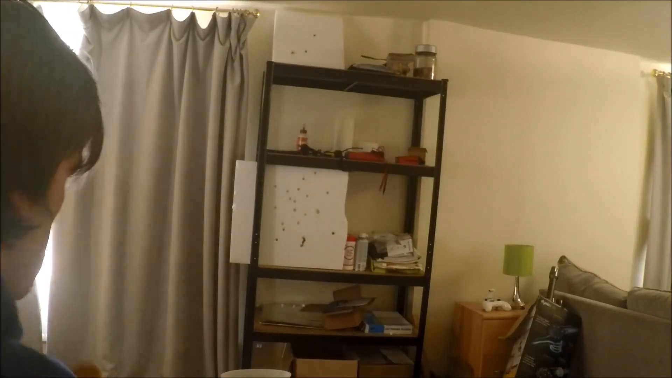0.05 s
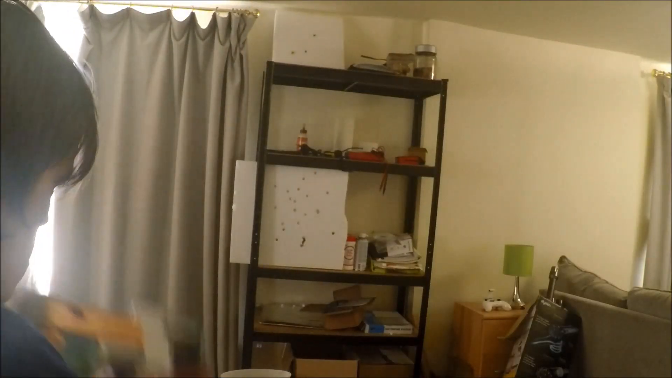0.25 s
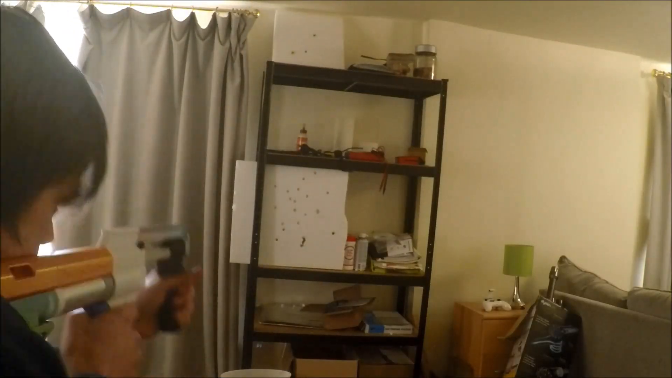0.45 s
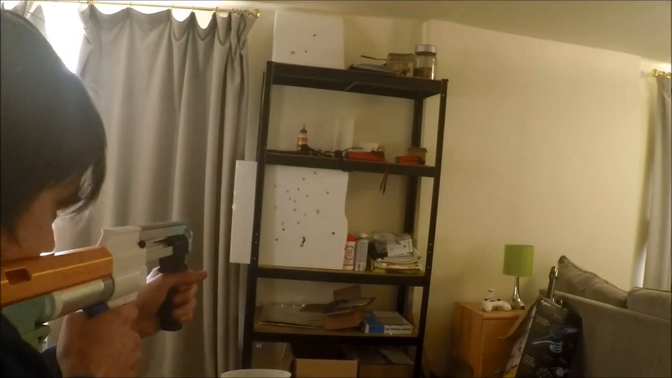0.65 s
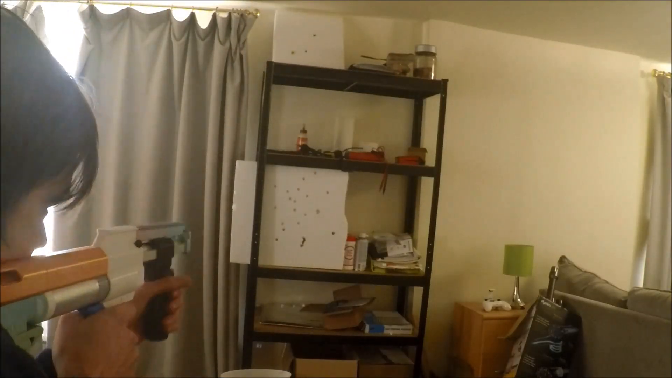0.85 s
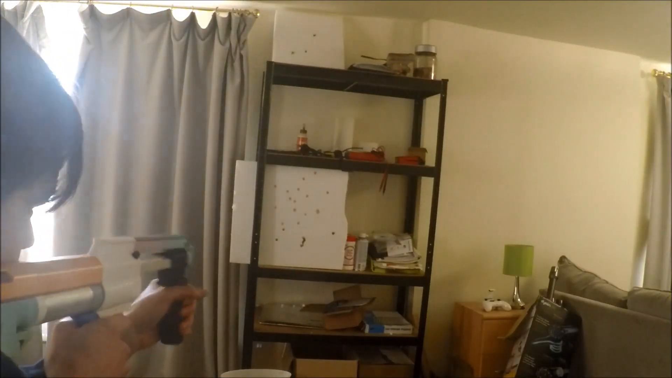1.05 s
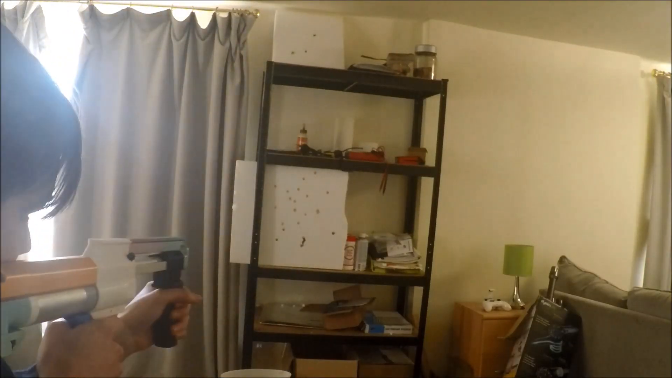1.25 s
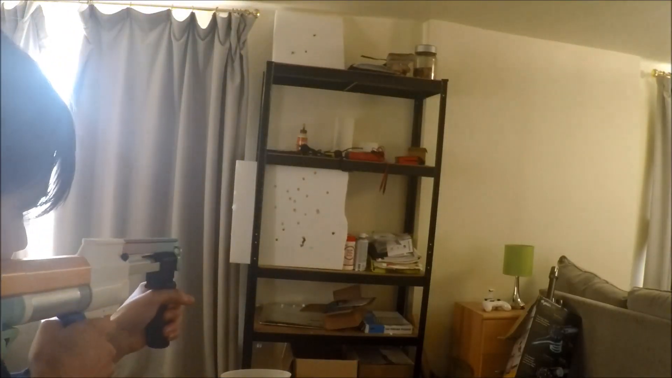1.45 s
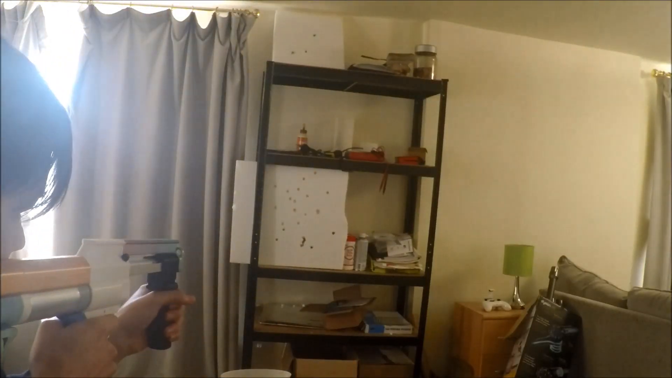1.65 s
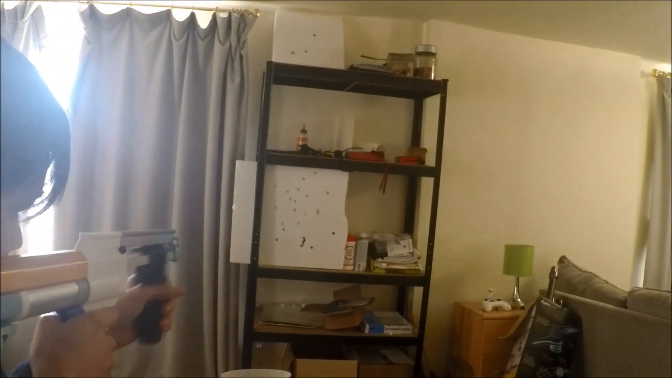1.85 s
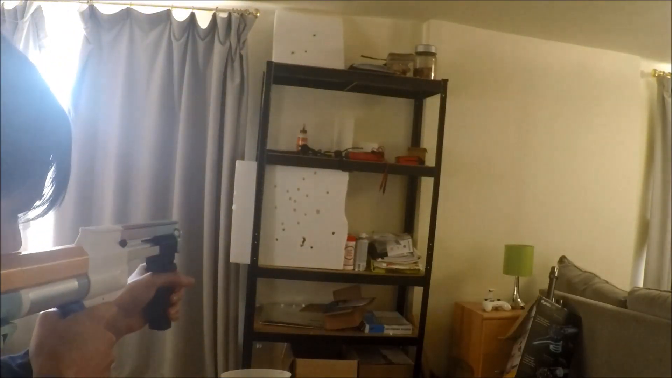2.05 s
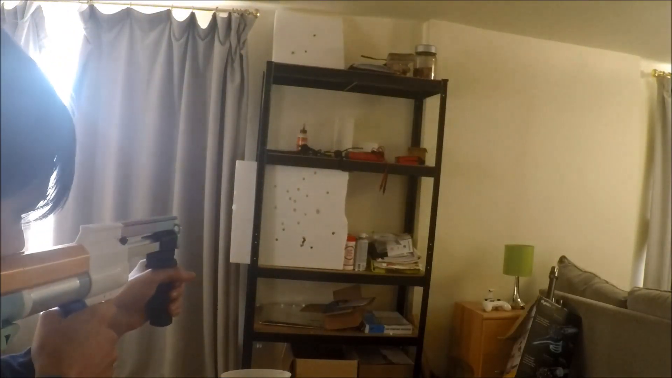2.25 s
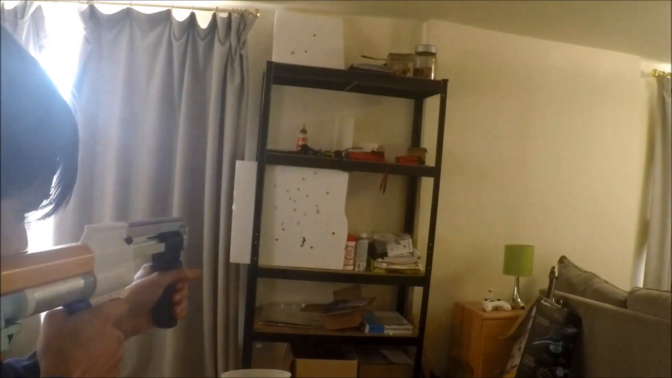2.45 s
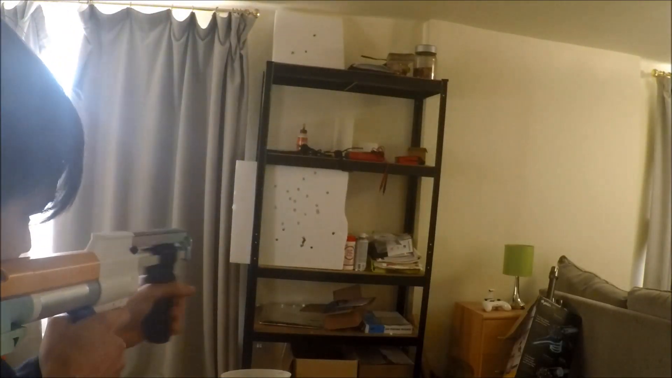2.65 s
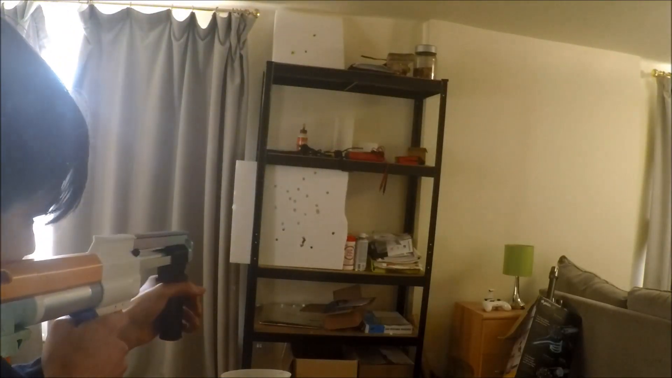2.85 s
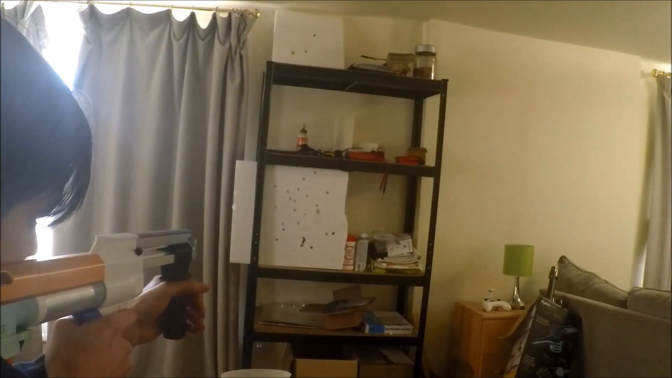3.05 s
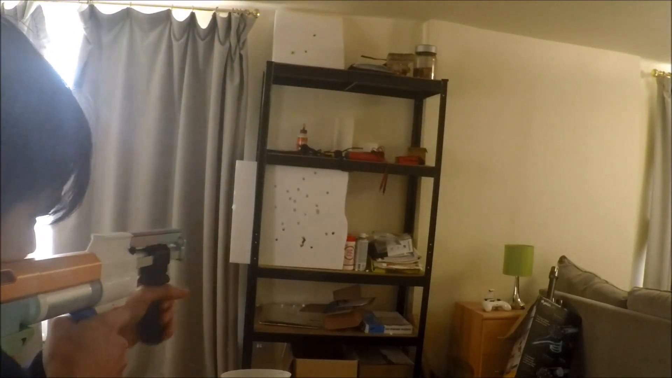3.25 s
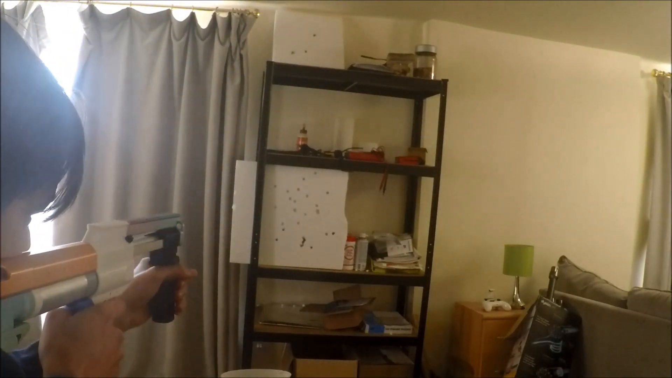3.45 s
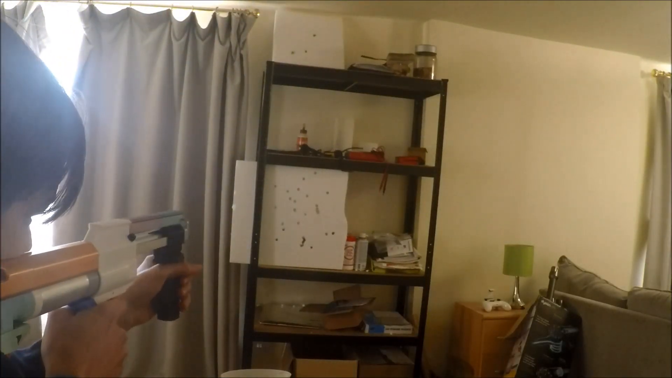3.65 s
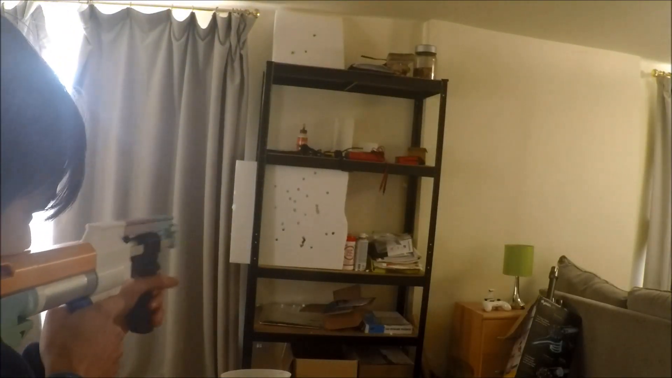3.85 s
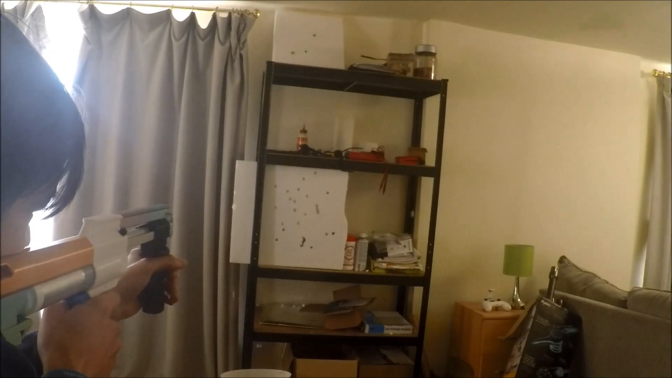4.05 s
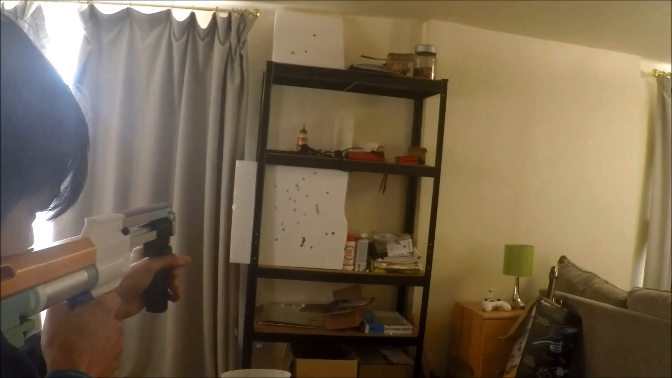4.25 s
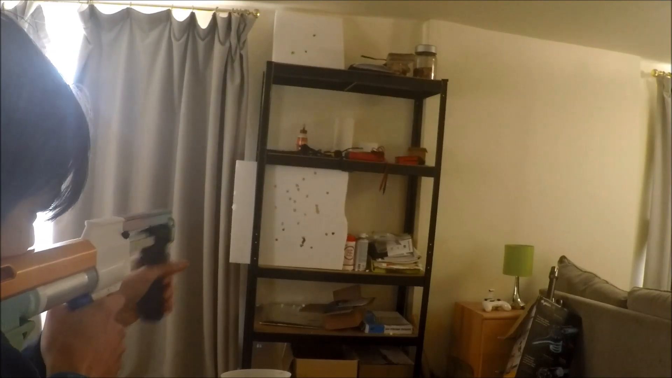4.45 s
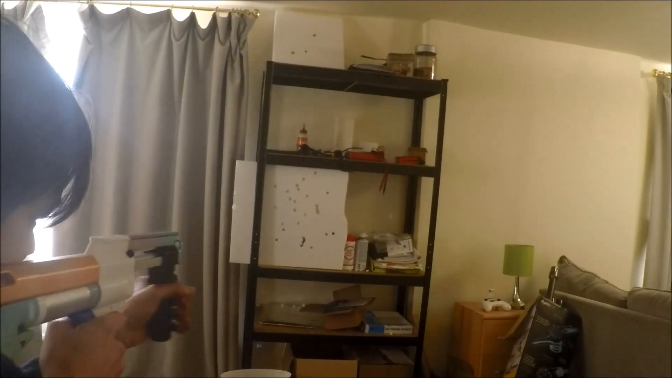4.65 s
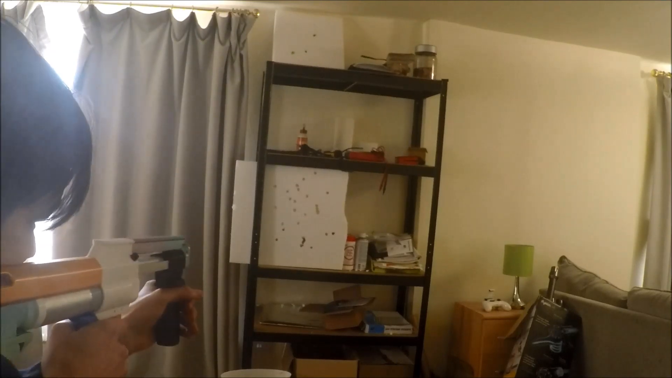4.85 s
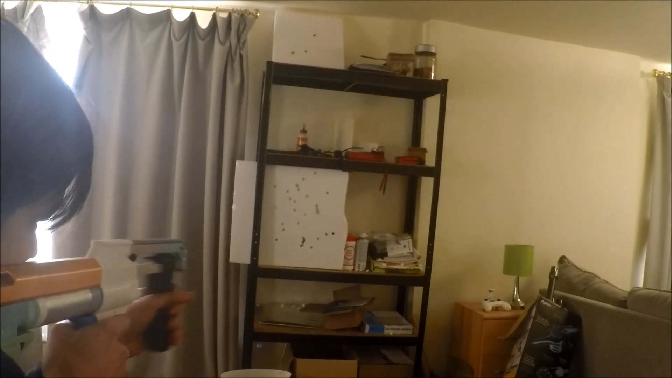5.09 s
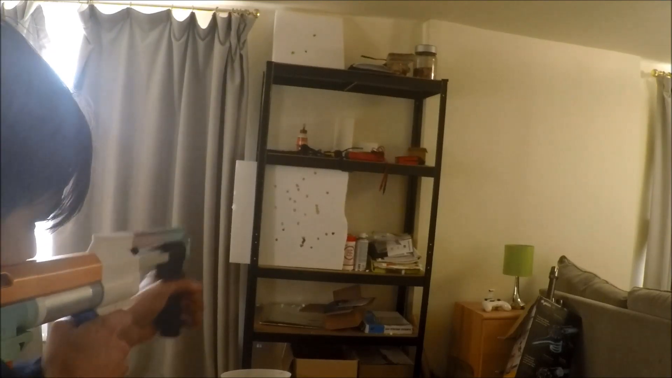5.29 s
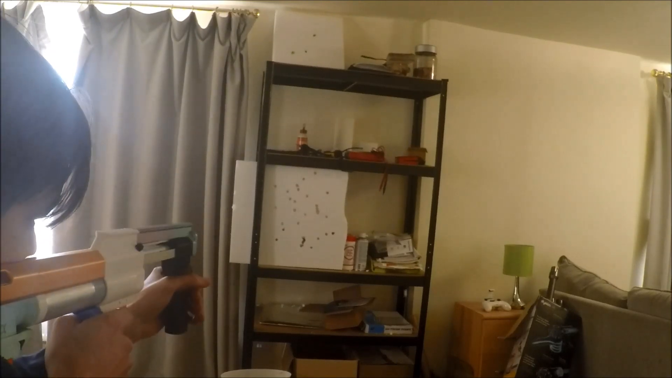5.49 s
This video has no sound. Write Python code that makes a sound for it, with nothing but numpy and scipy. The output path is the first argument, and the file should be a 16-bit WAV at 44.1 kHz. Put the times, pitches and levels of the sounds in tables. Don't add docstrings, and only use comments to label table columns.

```python
import sys
import numpy as np
from scipy import signal
from scipy.fft import rfft, irfft
from scipy.io import wavfile
from scipy.ndimage import uniform_filter1d

SR = 44100
rng = np.random.default_rng(int(sys.argv[2]) if len(sys.argv) > 2 else 0)


def transcribe(u):
    v = np.clip(np.atleast_2d(u).T, -1, 1)
    q = np.round(v * 32767).astype(np.int16)
    wavfile.write(sys.argv[1], SR, q)


def to_linear_factor(level_db):
    exponent = np.asarray(level_db, float) / 20
    return 10 ** exponent


N = 243476

# t/s, peak level/dB, rattle length/s, low-band level/dB, shell ring level/dB
REAR_STOPS = [(0.8889, -11.5, 0.011, 4, -18), (1.8114, -14, 0.0089, -14, -12.5),
              (2.5977, -22, 0.0093, 3, -9), (3.244, -24, 0.009, -1, -6.5),
              (3.8645, -18.5, 0.0114, -9, -10.5), (4.5741, -21, 0.0099, -5, -6),
              (5.1976, -24, 0.011, 8, -13)]
# t/s, peak level/dB, rattle length/s, low-band level/dB, shell ring level/dB
FRONT_STOPS = [(1.0886, -17.5, 0.014, 1.5, -23), (1.9579, -17.5, 0.015, 3.4, -22.5),
               (2.7679, -22.5, 0.016, 1.45, -24.5), (3.3796, -16, 0.011, 1.5, -22),
               (4.0258, -23.5, 0.017, 1.5, -18.5), (4.7133, -13, 0.0098, 0.51, -24),
               (5.3425, -20.5, 0.0078, 3.4, -17)]
# f/Hz, level per Hz/dB
SLIDE_SPECTRUM = [(120, -15.5), (250, -12.5), (570, -9), (1000, -2), (1900, -1), (2600, -6), (4200, -7),
                  (6300, -15), (10000, -23.5), (14600, -32.5), (16000, -42.5)]


def rms_one(x):
    return x / np.sqrt(np.mean(x ** 2) + 1e-20)


def at_hz(points, hz):
    table_hz, value = np.array(points)[:, 0], np.array(points)[:, 1]
    return np.interp(np.log(hz), np.log(table_hz), value)


def colour(x, points):
    size = 4096
    bin_hz = np.maximum(np.arange(size // 2 + 1), 1) * SR / size
    cepstrum = irfft(np.log(to_linear_factor(at_hz(points, bin_hz))))
    cepstrum[1:size // 2] *= 2
    cepstrum[size // 2 + 1:] = 0
    pulse = irfft(np.exp(rfft(cepstrum)))
    return signal.oaconvolve(x, pulse / np.linalg.norm(pulse))[:N]


def split(x, hz):
    low = signal.sosfilt(signal.butter(2, hz, fs=SR, output="sos"), x)
    high = signal.sosfilt(signal.butter(2, hz, "high", fs=SR, output="sos"), x)
    return low, high


def shelve(x, hz, low_gain, high_gain):
    low = signal.sosfilt(signal.butter(1, hz, fs=SR, output="sos"), x)
    return low * low_gain + (x - low) * high_gain


def held(times, db):
    step = np.searchsorted(times * SR - 64, np.arange(N))
    return to_linear_factor(np.append(db[0], db))[step]


def gate(times, level_db, hold, t60):
    t = np.arange(SR // 4) / SR
    out = np.zeros(N + SR)
    for start, db, hold_s in np.broadcast(times, level_db, hold):
        i = round(start * SR)
        out[i:i + len(t)] += to_linear_factor(db - 60 * np.maximum(t - hold_s, 0) / t60)
    return out[:N]


def grit(rough_db):
    unevenness = np.minimum(rng.exponential(1, N), 3)
    return rms_one(rng.standard_normal(N) * to_linear_factor(rough_db * unevenness))


def ring(clicks, hz, t60):
    r = to_linear_factor(-60 / (t60 * SR))
    w = 2 * np.pi * hz / SR
    return signal.lfilter([0, np.sin(w)], [1, -2 * r * np.cos(w), r * r], clicks + 1e-18)


def strike(times, level_db, modes, spread_db):
    share = rng.standard_normal((len(times), len(modes)))
    out = np.zeros(N)
    for k, (hz, mode_db, t60) in enumerate(modes):
        clicks = np.zeros(N + SR)
        clicks[np.round(times * SR).astype(int)] = to_linear_factor(level_db + mode_db + spread_db * share[:, k])
        out += ring(clicks[:N], hz, t60)
    return out


def hush():
    # f/Hz, level per Hz/dB
    floor_spectrum = [(20, -5), (45, 7), (70, -2.5), (130, -9.5), (250, -15), (450, -20.5), (1000, -23.5),
                      (3500, -28), (8000, -34), (14000, -40), (16000, -52)]
    lumps = to_linear_factor(1.7 * rms_one(split(rng.standard_normal(N), hz=21)[0]))
    noise = shelve(colour(rng.standard_normal(N), floor_spectrum), 200, lumps, 0.7)
    return to_linear_factor(-58) * split(noise, hz=22)[1]


def thuds():
    # t/s, peak level/dB, pitch f/Hz
    drops = [(0.095, -57.5, 101), (0.197, -58.5, 125), (0.3, -62, 161), (0.382, -52, 320),
             (0.413, -59, 158), (0.606, -57, 102.5), (0.824, -43, 480), (2.143, -58, 102),
             (2.805, -41.5, 514), (2.948, -49, 560), (0.929, -49, 350), (3.21, -34, 425), (4.529, -39, 510),
             (4.678, -37.5, 285), (4.748, -57, 194), (5.25, -37, 420), (5.299, -44, 178)]
    size, t60 = 4096, 0.097
    t = np.arange(size) / SR
    out = np.zeros(N)
    for start, peak_db, hz in drops:
        body = ring(rng.standard_normal(size), hz, 2.5 / hz)
        body = split(split(body, hz=900)[0], hz=0.49 * hz)[1]
        soft_onset = np.minimum(t / 0.002, 1)
        i = round(start * SR)
        out[i:i + size] += to_linear_factor(peak_db - 14.5) * rms_one(body * to_linear_factor(-60 * t / t60) * soft_onset)
    return out


def ticks(rows, ring_hz):
    start, peak_db, bright_db = np.transpose(rows)
    rise_s = 0.0017
    envelope = gate(start + rise_s / 2, peak_db - 12.0, 0.004, t60=0.02)
    burst = grit(rough_db=4.0) * uniform_filter1d(envelope, int(rise_s * SR) + 1)
    shell = shelve(colour(burst, SLIDE_SPECTRUM), 4000, 1.0, held(start, bright_db))
    return shell + to_linear_factor(-22) * ring(burst, ring_hz, 2.9 / ring_hz)


def slide(strokes, stops, swell_db, shine_db, settle):
    t = np.arange(N) / SR
    gain, bright_db = np.zeros(N), np.zeros(N)
    for (start, db, top_db), stop in zip(strokes, np.transpose(stops)[0]):
        to_go = np.clip((stop - t) / (stop - start), 0, 1)
        after = np.maximum(t - stop, 0)
        gain += (t > start) * to_linear_factor(db - 2 - swell_db * to_go - 60 * after / settle)
        dullness = np.maximum(to_go, np.minimum(after / 0.035, 1))
        bright_db = np.where(t > start, top_db - shine_db * dullness, bright_db)
    catch = to_linear_factor(1.8 * rms_one(split(rng.standard_normal(N), hz=90)[0]))
    snag_clicks = (rng.random(N) < 600 / SR) * rng.exponential(1, N)
    snags = 1 + to_linear_factor(5) * signal.lfilter([1], [1, -0.97], snag_clicks + 1e-18)
    rubbing = rms_one(grit(rough_db=4.5) * snags) * catch * uniform_filter1d(gain, size=200)
    return shelve(colour(rubbing, SLIDE_SPECTRUM), 4700, 0.6, to_linear_factor(bright_db))


def pump():
    # t/s, peak level/dB, brightness level/dB
    pull_ticks = [(0.777, -42.5, -15), (0.8037, -39, -11.5), (0.8242, -28.5, -12), (0.8614, -45, 3),
                  (1.712, -35, -4), (1.7444, -32.5, -9), (1.7692, -29.5, 4.5), (2.5268, -32.5, 1.5),
                  (2.5444, -34, 1), (2.5609, -33, 6), (3.1787, -26.5, 0.5), (3.209, -30.5, 3),
                  (3.8357, -27.5, -1.5), (4.4778, -30.5, -12), (4.5115, -30, -5), (4.5411, -34, -7),
                  (4.566, -34.5, 6), (5.127, -32, -17), (5.1617, -32, -9)]
    # t/s, peak level/dB, brightness level/dB
    push_ticks = [(0.989, -26, 6), (1.0316, -27, 2.5), (1.9106, -31, 8.5), (1.989, -38.5, -5),
                  (2.6724, -49, 8), (2.7124, -38, -7), (3.2984, -31, 6), (3.3362, -30, 4),
                  (3.3563, -29.5, 3.5), (3.933, -29.5, 8.5), (3.9758, -27, 0.5), (4.6014, -27, 4.5),
                  (4.6364, -25, -8), (4.6684, -32.5, -3), (5.2525, -31, 5), (5.2927, -30.5, 10)]
    # t/s, peak level/dB, brightness level/dB
    trigger_ticks = [
        (2.2622, -54.5, 6),
        (2.932, -47, -4.5),
        (4.2063, -55.5, 4),
    ]
    # start t/s, friction level/dB and brightness level/dB at the stop
    pulls = [(.824, -45.5, 14), (1.75, -38, 4.5), (2.53, -41, 2), (3.178, -43.5, 3), (3.8, -38, 1.5),
             (4.505, -40.5, 4), (5.12, -42, 2.5)]
    # start t/s, friction level/dB and brightness level/dB at the stop
    pushes = [(1.005, -43.5, 8.8), (1.87, -41.5, 5.1), (2.67, -46, 7.5), (3.265, -46, 7.9),
              (3.94, -47.5, 7.7), (4.63, -46.5, 13.4), (5.26, -44, 7)]
    pull = slide(pulls, REAR_STOPS, swell_db=9.5, shine_db=2, settle=0.26)
    pull = pull + ticks(pull_ticks, ring_hz=1810)
    push = slide(pushes, FRONT_STOPS, swell_db=0, shine_db=8.5, settle=0.1)
    push = push + ticks(push_ticks, ring_hz=2250)
    return pull + push + ticks(trigger_ticks, ring_hz=2450)


def clacks(rows, points, ring_hz, high_db):
    start, peak_db, rattle, low_db, ring_db = np.transpose(rows)
    rattling = gate(start, peak_db - 9, rattle, t60=0.025)
    first_hit = gate(start, peak_db - 17.5, 0.00082, t60=0.011)
    blows = grit(rough_db=10.5) * (rattling + first_hit)
    shell = shelve(colour(blows, points), 790, held(start, low_db), 0.72)
    shell = shelve(shell, 6000, 0.85, to_linear_factor(high_db))
    hollow = ring(blows * held(start, ring_db), ring_hz, t60=0.006)
    return split(shell + hollow, hz=212)[1]


def grip_stops():
    # f/Hz, level per Hz/dB
    rear_spectrum = [(150, -29.5), (700, -14), (1300, -10), (1900, 0.5), (2450, -0.5), (3200, -2),
                     (4700, -6), (6000, -13.5), (10000, -25), (15000, -35.5), (16000, -43)]
    # f/Hz, level per Hz/dB
    front_spectrum = [(150, -8), (570, -18.5), (950, -1.5), (1300, -9.5), (1750, 1), (2300, 1), (4200, 0),
                      (6400, -6), (10400, -16.5), (14500, -31.5), (16000, -46.5)]
    rear = clacks(REAR_STOPS, rear_spectrum, ring_hz=2485, high_db=4.5)
    front = clacks(FRONT_STOPS, front_spectrum, ring_hz=1823, high_db=1.2)
    return rear + front


def spring_ring():
    # f/Hz, level/dB, t60/s
    spring_modes = [(3830, -36, 0.2), (1800, -38, 0.11)]
    start, peak_db = np.transpose(FRONT_STOPS)[:2]
    return strike(start, peak_db, spring_modes, spread_db=-2.5)


def rush_db(t):
    rise_s, hold_s, sag_s, t60 = 0.013, 0.0066, 0.0093, 0.066
    start_db, top_db, sag_db = -28.5, -18, -6.5
    leak_s, leak_db = 0.0052, -50.5
    bottom = rise_s + hold_s
    level = np.interp(t, [0, rise_s, bottom, bottom + sag_s], [start_db, top_db, top_db, top_db + sag_db])
    level = level - 60 * np.maximum(t - bottom - sag_s, 0) / t60
    return np.where(t > 0, level, np.where(t > -leak_s, leak_db, -np.inf))


def shots():
    releases = [1.4713, 2.2995, 2.9693, 3.6179, 4.2469, 4.9292, 5.498]
    # level/dB, brightness level/dB, thump level/dB
    shot_levels = [
        (5, -6, 3),
        (0.5, 2, 0),
        (2, -0.5, 0.5),
        (3, -2.5, 1),
        (0.5, 3, 0.5),
        (1, 2, 0.5),
        (1.5, 2, 0),
    ]
    # t after release/s, level/dB
    slam_delays = [
        (.0103, -9),
        (.0138, -9),
        (.0165, -12),
        (.0202, -11),
    ]
    # f/Hz, level/dB, t60/s
    head_modes = [(1150, -16, 0.0033), (2940, -1, 0.0022), (4170, -13.5, 0.0013), (6900, -12.5, 0.0017),
                  (9450, -8.5, 0.0017)]
    # f/Hz, level per Hz/dB
    rush_spectrum = [(210, -24.5), (350, 1), (870, 1), (1500, -2), (3700, -2.5), (6000, -6), (9500, -16),
                     (12500, -21.5), (14800, -27.5), (16000, -51)]
    # f/Hz, level/dB, t60/s
    tube_modes = [(232, -23, .12), (288, -24, .14)]
    # f/Hz, level/dB, t60/s
    room_modes = [(63.6, -23.5, 0.4), (46.5, -41.5, 0.94), (125.8, -29.5, 0.55), (178, -27, 0.2)]
    start = np.array(releases)
    force_db, bright_db, thump_db = np.transpose(shot_levels)
    t = np.arange(N) / SR
    rush = sum(to_linear_factor(rush_db(t - at) + db) for at, db in zip(start, force_db))
    slams = sum(strike(start + late, force_db + db, head_modes, spread_db=6.0) for late, db in slam_delays)
    air = colour(rush * grit(rough_db=3.0), rush_spectrum) + slams
    air = shelve(air, 6000, 0.85, held(start - 0.01, bright_db))
    thump = strike(start + 0.0012, thump_db, tube_modes, spread_db=0.5)
    thump = thump - strike(start + 0.0055, thump_db, room_modes, spread_db=0.3)
    return air, split(thump, hz=705)[0]


def smacks():
    arrivals = [1.5311, 2.3494, 3.0211, 3.6721, 4.2955, 4.9807]
    # peak level/dB, boom level/dB, snap level/dB, sizzle level/dB, knock level/dB
    dart_levels = [
        (-8, 0, -0.7, -0.5, 0),
        (-6, 1.6, 0.3, 6.5, -0.1),
        (-7.5, -1.2, -0.6, 4.5, 2.2),
        (-11.5, -1, 9.5, -4.2, -3.5),
        (-7, -3, .2, 2.5, 0.5),
        (-9.5, 2, 4, 4, 2),
    ]
    # f/Hz, level/dB, t60/s
    board_modes = [(560, -7, .02), (690, -3, .03), (880, -6, .02), (1070, -2, .02), (1350, -5, .02),
                   (2250, -10, .01)]
    # f/Hz, level/dB, t60/s
    boom_modes = [(151, -21, 0.059), (176.5, -1, 0.079), (227, 1, 0.086), (282, -8.5, 0.1)]
    # f/Hz, level per Hz/dB
    panel_spectrum = [(150, -21.5), (370, -7), (600, 1), (1070, 0.5), (1500, -4), (2300, -9.5), (4500, -18),
                      (9700, -31), (14800, -41.5), (16000, -53.5)]
    start = np.array(arrivals)
    peak_db, boom_db, snap_db, sizzle_db, knock_db = np.transpose(dart_levels)
    tip = -strike(start, peak_db - 2.5, board_modes, spread_db=1.4)
    shaft = -strike(start + 0.0021, peak_db - 7, board_modes, spread_db=2.4)
    boom = -strike(start + 0.0058, peak_db + boom_db - 8.5, boom_modes, spread_db=-0.2)
    shudder = colour(grit(rough_db=3) * gate(start, peak_db - 7, 0.01, t60=0.14), panel_spectrum)
    crack = grit(rough_db=-8.5) * gate(start, peak_db - 11, 0.0012, t60=0.023)
    crack = split(split(crack, hz=2000)[1], hz=8000)[0]
    shudder = shelve(shudder + crack, 2600, 0.68, held(start, snap_db))
    shudder = shelve(shudder, 7000, 0.99, held(start, sizzle_db))
    return (tip + shaft) * held(start, knock_db) + shudder, boom


def scuffs():
    # t/s, peak level/dB, start f/Hz, end f/Hz, length/s
    skids = [
        (5.254, -38.5, 146, 368, 0.0352),
        (2.843, -48.5, 310, 97, 0.024),
    ]
    out = np.zeros(N)
    for start, peak_db, start_hz, end_hz, length in skids:
        along = np.linspace(0, 1, int(length * SR))
        wobble = rms_one(split(rng.standard_normal(4096), hz=60)[0])[:len(along)]
        pitch = (start_hz + (end_hz - start_hz) * along) * (1 + 0.037 * wobble)
        tone = np.sin(2 * np.pi * np.cumsum(pitch) / SR)
        out[round(start * SR):][:len(along)] += to_linear_factor(peak_db) * np.sin(np.pi * along ** 0.44) * tone
    return out


def room(x):
    # f/Hz, t60/s
    decay = [(60, 0.16), (250, 0.39), (1000, 0.29), (4000, 0.29), (12000, 0.21)]
    t = np.arange(SR // 2) / SR
    tail = 0
    for hz in 45 * 2. ** (np.arange(26) / 3):
        edges = [hz / 2 ** (1 / 6), hz * 2 ** (1 / 6)]
        band = signal.butter(2, edges, "band", fs=SR, output="sos")
        t60 = at_hz(decay, hz)
        dying = signal.sosfilt(band, rng.standard_normal(len(t))) * to_linear_factor(-60 * t / t60)
        tail = tail + rms_one(dying) * np.sqrt(hz * t60)
    tail = tail * np.clip(t / 0.0013, 0, 1)
    return signal.oaconvolve(x, tail / np.linalg.norm(tail))[:N]


def scene():
    background = hush()
    small = pump() + thuds() + scuffs()
    stops = grip_stops()
    spring = spring_ring()
    rush, thump = shots()
    smack, boom = smacks()
    near = to_linear_factor(-13.5) * rush + to_linear_factor(-10.5) * stops + to_linear_factor(-2.5) * small
    far = to_linear_factor(-9) * smack + to_linear_factor(-8.0) * boom
    sway = 2 * np.pi * 4.3 * np.arange(N) / SR
    wet = room(near * np.cos(sway) + far) + room(near * np.sin(sway))
    return (rush + thump + smack + boom + stops + spring + small + wet + background)[None]


def roll_off(x):
    return signal.sosfilt(signal.butter(12, 16320, fs=SR, output="sos"), x)


def record(dry):
    cut = split(dry, hz=26)[1]
    flat = cut / (1 + (np.abs(cut) / 0.47) ** 4) ** (1 / 4)
    top = signal.cheby1(8, 0.5, 15150, fs=SR, output="sos")
    return roll_off(signal.sosfilt(top, flat))


dry = scene()
out = record(dry)
transcribe(out)
```